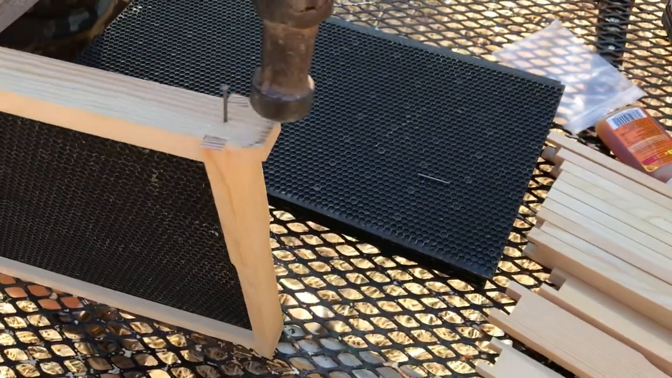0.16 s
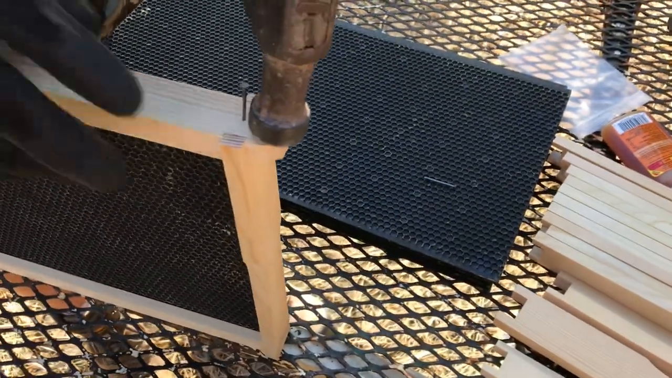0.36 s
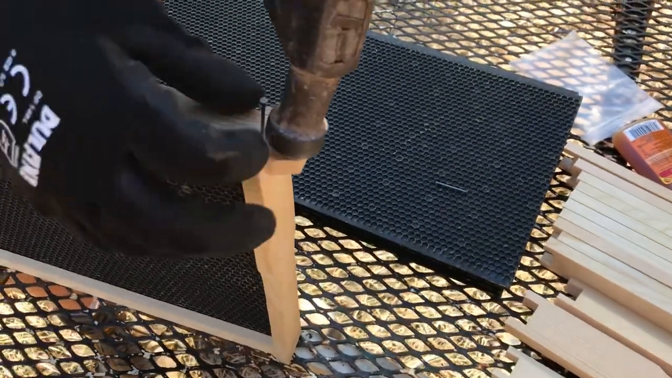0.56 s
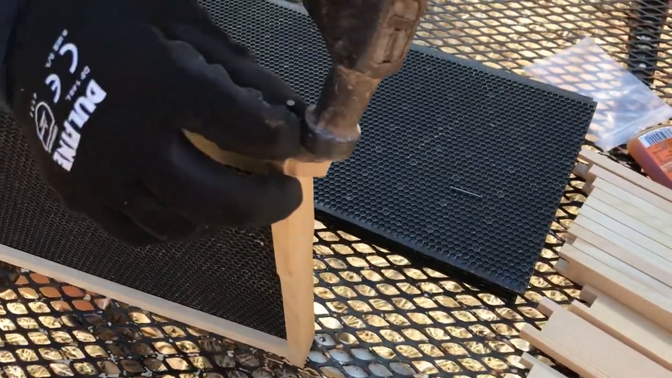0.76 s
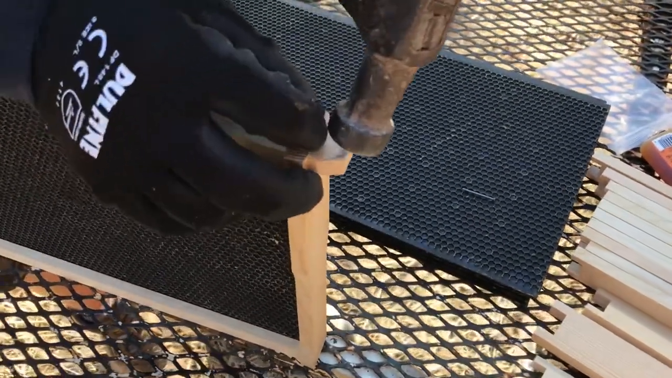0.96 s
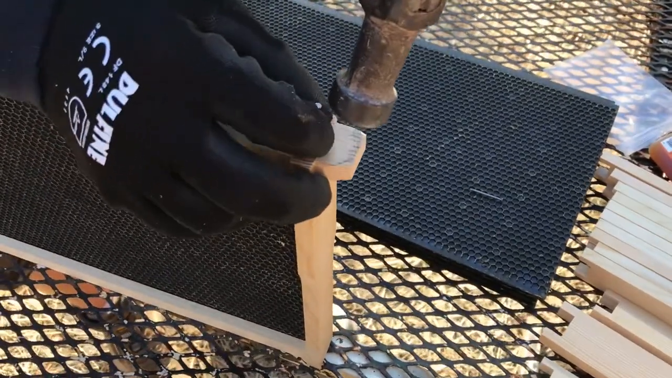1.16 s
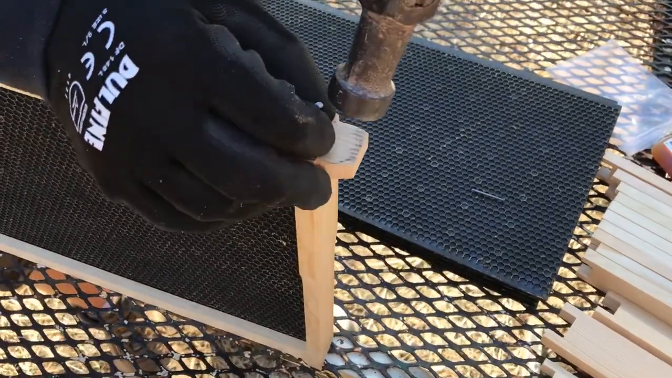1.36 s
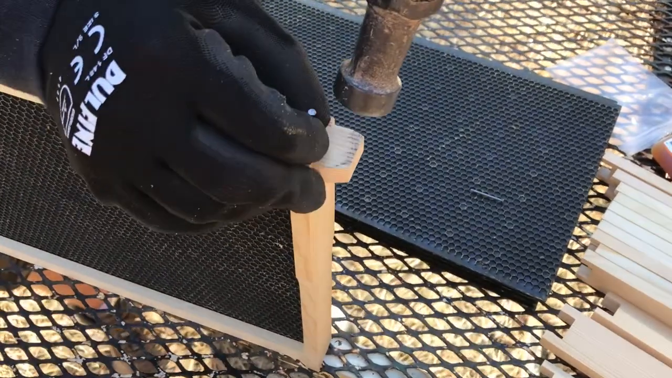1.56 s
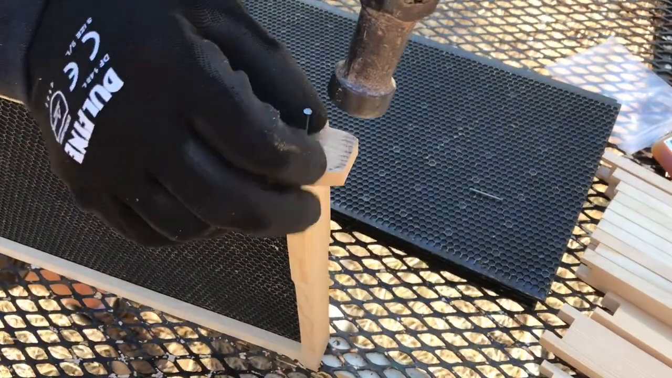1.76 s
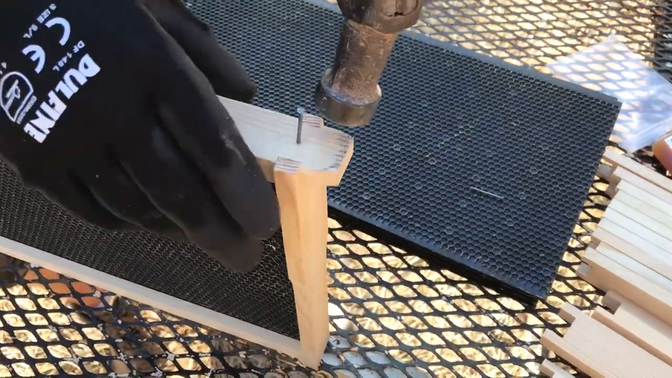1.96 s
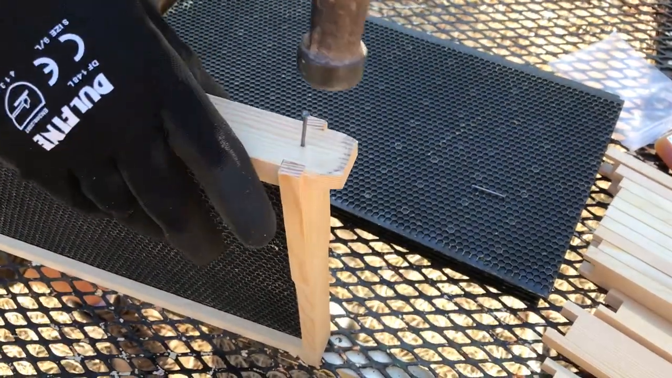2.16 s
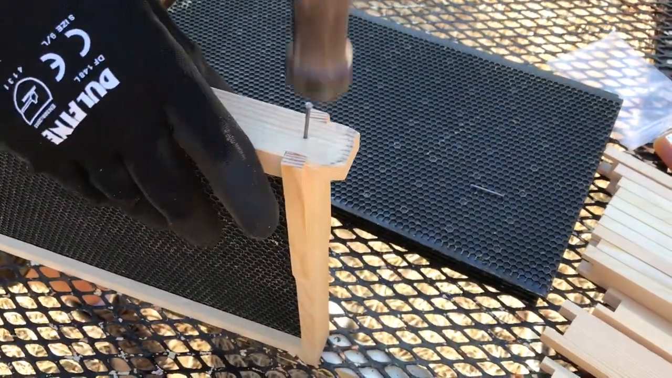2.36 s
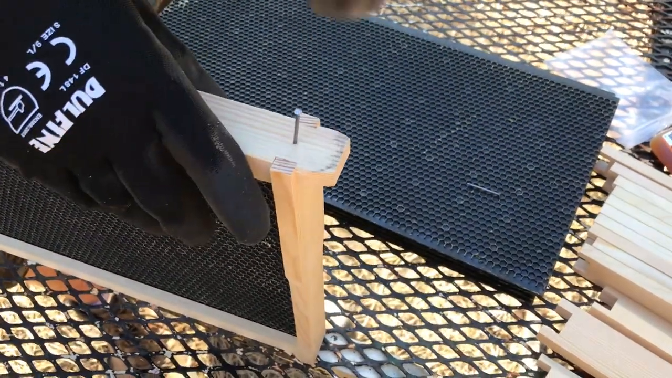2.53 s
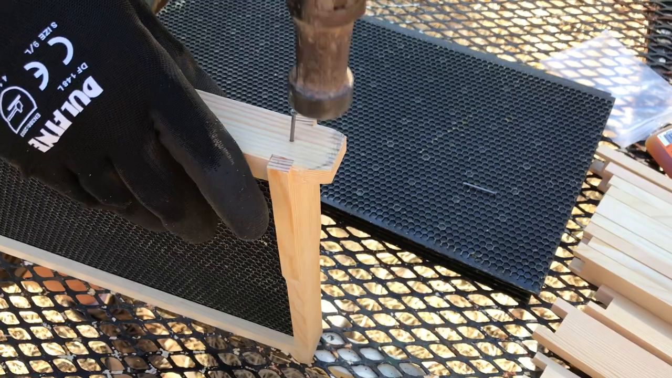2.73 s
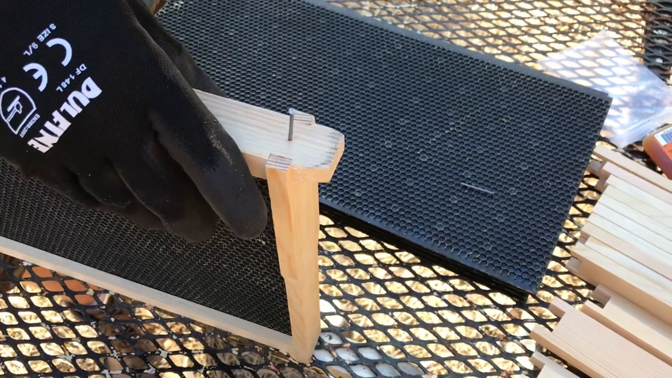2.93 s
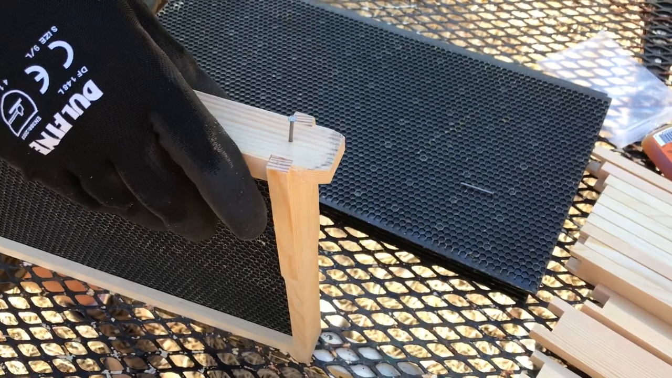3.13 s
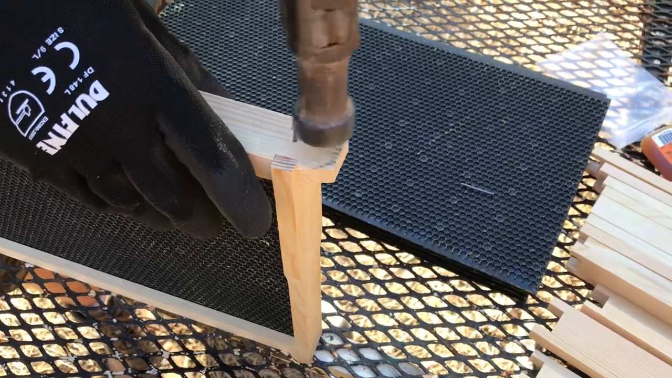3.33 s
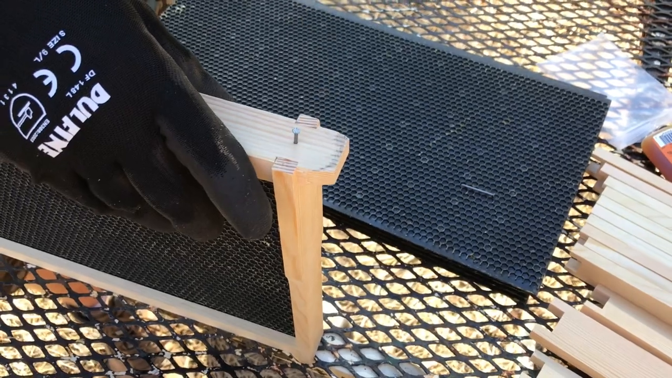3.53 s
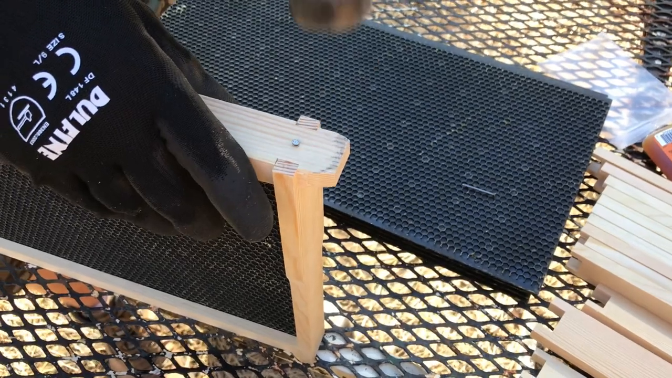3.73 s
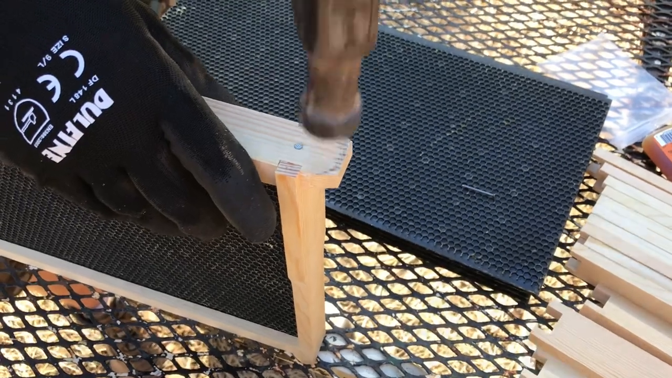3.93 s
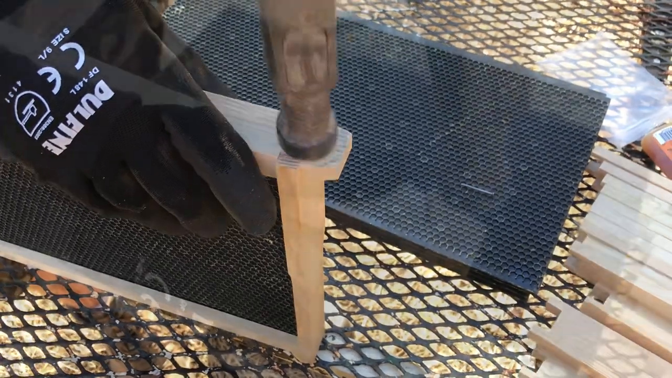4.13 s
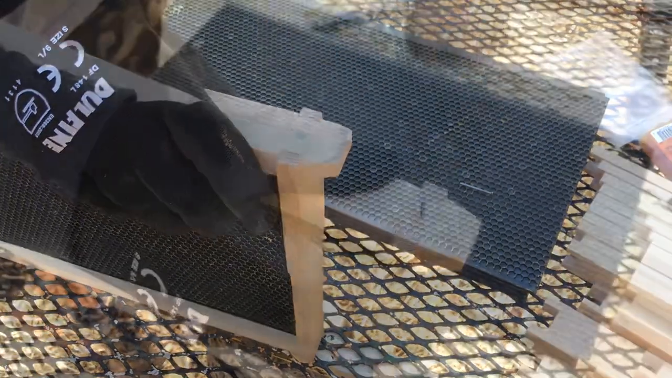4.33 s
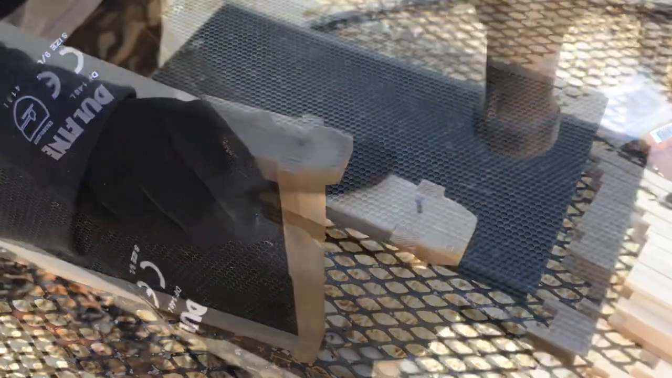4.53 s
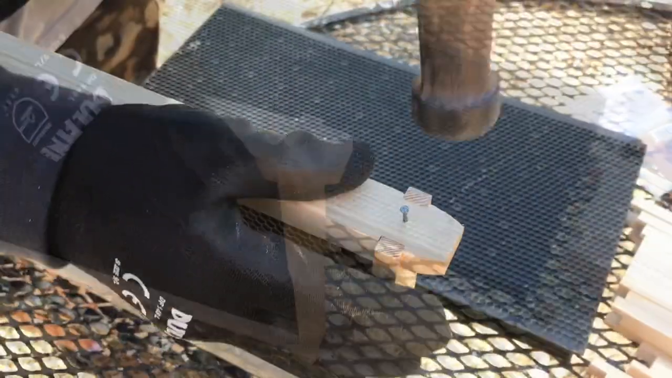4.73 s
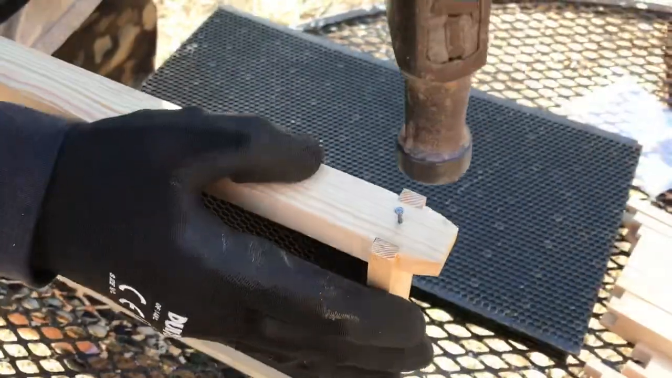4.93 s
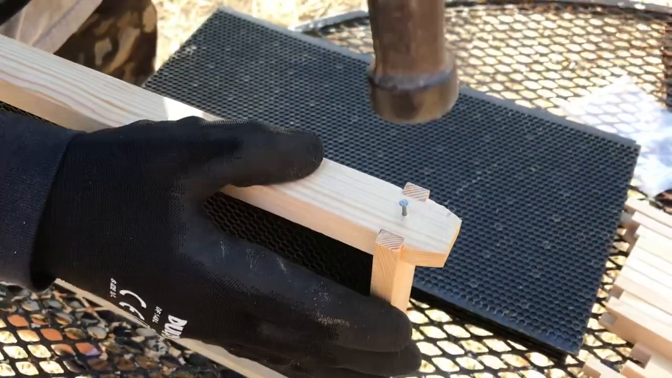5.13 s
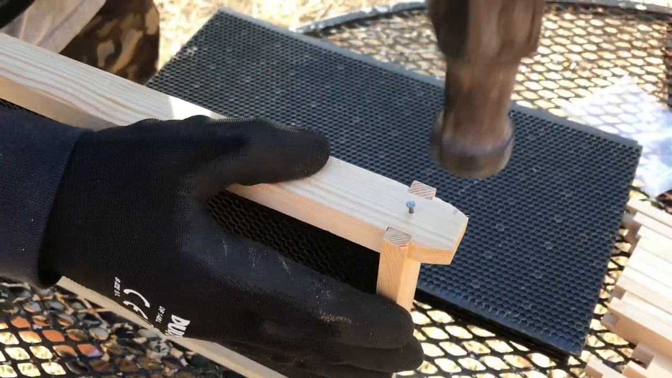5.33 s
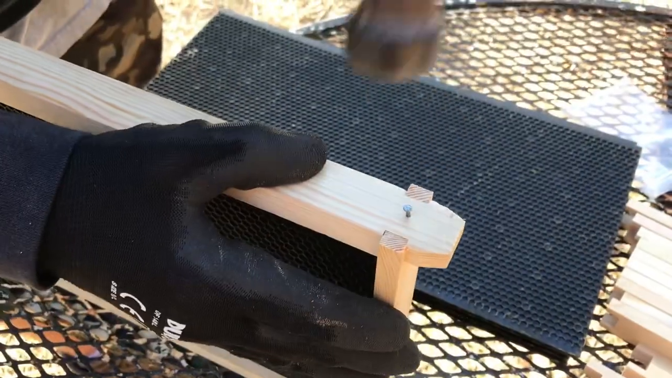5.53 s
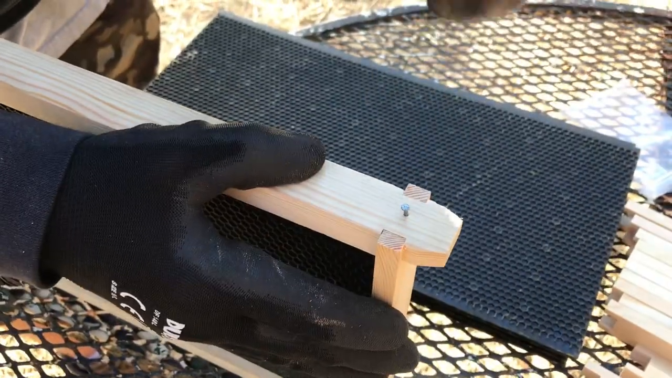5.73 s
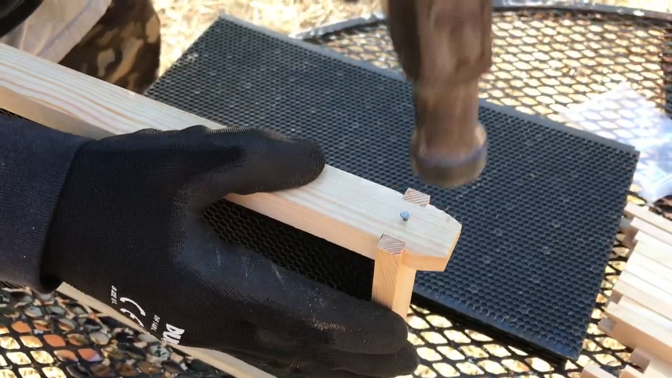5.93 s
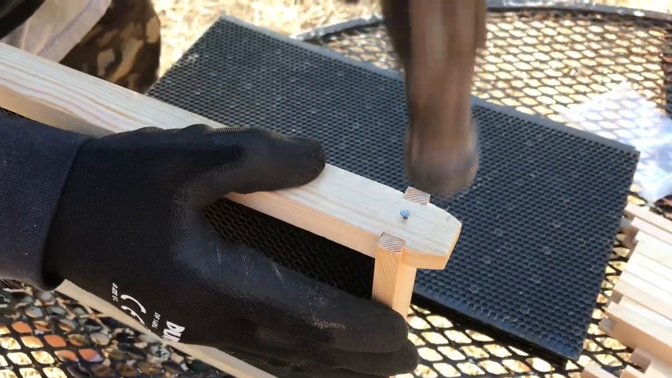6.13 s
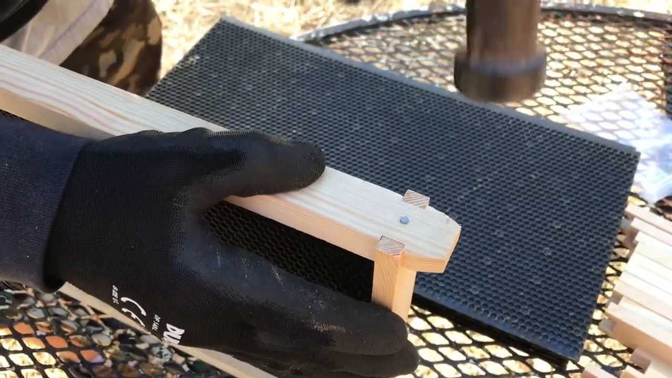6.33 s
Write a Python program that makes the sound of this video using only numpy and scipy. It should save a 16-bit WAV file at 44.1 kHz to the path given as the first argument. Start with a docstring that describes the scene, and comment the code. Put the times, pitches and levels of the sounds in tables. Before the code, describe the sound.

Outdoors, a rubber glove rubs faintly on wood with a few small ticks while distant engines hum. Then a hammer drives a small nail into a wooden frame with eight steady blows, each a sharp steel crack and wooden knock that rattles the metal mesh table beneath. Three more blows follow, with a faint glove squeak after the first. The microphone is close and the sound nearly dry.

```python
"""Close up and outdoors, a hammer drives small nails into wooden frames on a steel mesh table.
A far engine idles in the hush while a rubber glove rubs on the wood, with a faint tap and a few ticks.
A second engine pulls away, and from 2.4 s the blows fall: each cracks on the nail, knocks the wood and
sets the table rattling while the frame bounces on it. From 4.3 s the work is on a second frame, pressed
down harder; the departing engine fades, and the glove squeaks before the last two blows."""
import sys
import numpy as np
from scipy import signal
from scipy.fft import rfft, irfft
from scipy.io import wavfile
from scipy.ndimage import uniform_filter1d

SR = 44100
rng = np.random.default_rng(int(sys.argv[2]) if len(sys.argv) > 2 else 0)


def digitize_waveform(pressure):
    """Quantize a signal to 16-bit integers and store it at the path in sys.argv[1].

    Rows of a 2-D input are taken as channels; values are limited to [-1, 1].
    """
    field = np.atleast_2d(pressure).T
    bounded = np.clip(field, -1, 1)
    quanta = np.round(bounded * 32767).astype(np.int16)
    wavfile.write(sys.argv[1], SR, quanta)


N = 285768
TIME = np.arange(N) / SR
BLOW_T = np.arange(SR // 2) / SR

# bright colour of struck steel: f/Hz, level/dB
STEEL_COLOUR = [(200, -15), (1500, -9), (3000, -9), (5000, -0.5), (7300, 3), (9000, -1.5), (10400, -4.5),
                (12500, -2.5), (15000, -10), (17000, -9.5)]


def gain_of(db):
    """Decibels to amplitude."""
    return 10 ** (np.asarray(db) / 20)


def unit_rms(x, size=None):
    """Scales to rms 1 over the first size samples."""
    return x / np.sqrt(np.mean(x[:size] ** 2) + 1e-20)


def curve_at(points, hz):
    """Joins (f/Hz, value) points on a log-frequency axis."""
    f, value = np.transpose(points)
    return np.interp(np.log(hz + 1), np.log(f + 1), value)


def add(mix, s, sound):
    """Lays a sound into the mix at s seconds."""
    part = mix[max(round(s * SR), 0):][:len(sound)]
    part += sound[:len(part)]


def coloured(x, colour):
    """Equalises by an (f/Hz, level/dB) curve."""
    hz = np.fft.rfftfreq(len(x), 1 / SR)
    return irfft(rfft(x) * gain_of(curve_at(colour, hz)), len(x))


def noise(colour, size):
    """Coloured noise of rms 1."""
    return unit_rms(coloured(rng.standard_normal(size), colour))


def band_rms(x, lo, hi):
    """Rms of x between two frequencies."""
    hz = np.fft.rfftfreq(len(x), 1 / SR)
    band = rfft(x)[(hz > lo) & (hz < hi)]
    return np.sqrt(2 * np.sum(abs(band) ** 2) + 1e-20) / len(x)


def wander(per_s, size):
    """Smooth random motion of rms 1 that changes about per_s times a second."""
    hz = np.fft.rfftfreq(size, 1 / SR)
    return unit_rms(irfft(rfft(rng.standard_normal(size)) / (1 + (hz / per_s) ** 4), size))


def burst(colour, t60, rise_s):
    """A dying puff of noise, rms 1 over its first 3 ms."""
    t = BLOW_T[:4096]
    envelope = (1 - np.exp(-t / rise_s)) * gain_of(-60 * t / t60)
    return unit_rms(noise(colour, len(t)) * envelope, size=132)


def air(mid_db=-63, swell_db=1.25):
    """A gently swelling bed of outdoor rumble and hush, with thin hiss on top."""
    # colour of the bed: f/Hz, level/dB
    colour = [(24, -32), (40, -3), (112, -8), (146, -9.5), (280, -17.5), (769, -25), (955, -22),
              (2270, -32), (7730, -42.5), (8510, -40), (10300, -47.5), (12500, -43), (16200, -73.5),
              (22000, -120)]
    # narrow bands of hiss: f/Hz, half width/Hz, level/dB
    hiss_bands = [(13040, 50, -82.5), (14400, 330, -75)]
    hush = noise(colour, N)
    hush /= band_rms(hush, 300, 3000)
    f = np.fft.rfftfreq(N, 1 / SR)
    hiss = np.zeros(N)
    for hz, width, db in hiss_bands:
        band = rfft(rng.standard_normal(N)) / np.hypot(1, (f - hz) / width)
        hiss += gain_of(db) * unit_rms(irfft(band, N))
    return gain_of(mid_db + swell_db * wander(2.5, N)) * hush + hiss


def idling_engine(drift=0.0031):
    """Only the low firing tones of a distant idle carry this far."""
    # engine hum: f/Hz, rms level/dB
    tones = [(45.4, -59), (68.1, -61), (90.8, -55), (136.2, -59), (158.9, -69)]
    clock = np.cumsum(1 + drift * wander(2.5, N)) / SR
    hum = sum(gain_of(db) * np.sin(2 * np.pi * (hz * clock + rng.random())) for hz, db in tones)
    return np.sqrt(2) * hum


def glove_rub(grain_db=1.5, unsteady_db=1.6, attack_s=0.015, release_s=0.063):
    """Rubber slides on wood: grainy friction that swells and fades with each stroke."""
    # glove strokes: t/s, length/s, level above 3 kHz/dB, tilt/(dB per octave)
    strokes = [(0.0, 0.28, -58, -4), (0.629, 0.28, -66, 0), (1.765, 0.1, -56.5, 2.5), (1.849, 0.3, -61, .5),
               (4.784, .2, -53, 7), (5.0, 0.18, -67, 3.5), (5.497, 0.13, -56.5, 4)]
    # friction colour before the tilt: f/Hz, level/dB
    friction = [(200, -12), (700, -6.5), (1300, 3), (2200, -1), (3200, 3.5), (4300, 5), (5500, -1),
                (8000, -2.5), (11000, -5.5), (16000, -10.5)]
    out = np.zeros(N)
    for s, length, db, tilt_db in strokes:
        size = int(length * SR)
        t = np.arange(size) / SR
        grains = noise([(hz, level + tilt_db * np.log2(hz)) for hz, level in friction], size)
        grains *= gain_of(grain_db * wander(400, size) + unsteady_db * wander(40, size))
        grains /= band_rms(grains, 3000, 16000)
        pressure = np.minimum(t / attack_s, 1) * np.minimum((length - t) / release_s, 1) ** 2
        add(out, s, gain_of(db) * pressure * grains)
    return out


def nail_crack(catch_s=.0014, catch_db=-4, fizz_db=-9):
    """Steel meets steel in a sharp pulse; the nail slips into the wood and is caught again."""
    pulse = unit_rms(coloured(signal.unit_impulse(4096, 16), STEEL_COLOUR), size=132)
    out = .6 * pulse + burst(STEEL_COLOUR, t60=.003, rise_s=.00004)
    add(out, catch_s, gain_of(catch_db) * burst(STEEL_COLOUR, t60=0.0099, rise_s=.00005))
    fizz = gain_of(fizz_db) * burst(STEEL_COLOUR, t60=.035, rise_s=0.0013)
    return unit_rms(out + fizz, size=132)


def head_ring(hz=5675, relative_db=-54, t60=.9):
    """The steel hammer head sings on faintly in its one lasting mode."""
    return gain_of(relative_db - 60 * BLOW_T / t60) * np.sin(2 * np.pi * hz * BLOW_T)


def wood_knock(modes, pitch, spread_db=1.5, detune=.003):
    """The wooden frame rings briefly, a little differently at every blow."""
    hz, db, t60 = np.transpose(modes)[:, :, None]
    level, shift = rng.standard_normal((2, len(modes), 1))
    t = BLOW_T[:6000]
    envelopes = gain_of(db + spread_db * level - 60 * t / t60)
    rings = envelopes * np.sin(2 * np.pi * hz * pitch * (1 + detune * shift) * t)
    signs = (-1.) ** np.arange(len(modes))[:, None]  # neighbouring modes swing in opposite senses
    return unit_rms((signs * rings).sum(0), size=353)


def mesh_rattle(bass_db, treble_db, stretch, swell_s=0.0046, bass_swell_s=0.017):
    """The loose mesh chatters in clumps, dying faster as it comes to rest."""
    # mesh colour before the tilt: f/Hz, level/dB
    colour = [(30, -27.5), (60, -3.5), (120, 1), (200, -2), (270, -7), (360, -7), (470, -7.5), (600, 1),
              (1300, 2), (2500, -2), (4200, -6), (5200, -10.5), (8500, -19), (10500, -24.5), (12500, -22.5),
              (16000, -29)]
    # mesh decay before stretch and settling: f/Hz, t60/s
    decay = [(80, 0.43), (300, 0.41), (800, .31), (1600, 0.23), (4000, 0.3), (8000, 0.49), (15000, 0.22)]
    size = len(BLOW_T)
    hz, t, spectrum = signal.stft(noise(colour, size), SR, nperseg=256, noverlap=192)
    hz = hz[:, None]
    tilt_db = curve_at([(500, bass_db + 2.5), (1400, 0.0018), (3800, treble_db + 1.5)], hz)
    age = t / stretch
    decay_db = -60 * age / curve_at(decay, hz)
    settle_db = -9 * (age / 0.087) ** 2 * curve_at([(100, 0.16), (1200, 0.27), (8000, 0.81)], hz)
    clumps = np.interp(t, BLOW_T, wander(160, size))
    chatter_db = 3 * clumps * curve_at([(300, .2), (1500, 0.92), (7000, 0.95)], hz)
    spectrum *= gain_of(tilt_db + decay_db + settle_db + chatter_db)
    rattle = signal.istft(spectrum, SR, nperseg=256, noverlap=192)[1][:size]
    # the heavy, slow motion of the table builds up later than its chatter
    boom = coloured(rattle, [(400, -7.5), (800, -37)])
    out = boom * (1 - np.exp(-BLOW_T / bass_swell_s))
    out += (rattle - boom) * (1 - np.exp(-BLOW_T / swell_s))
    return out / band_rms(out[617:2866], 900, 2500)  # mids at rms 1 from 14 to 65 ms


def frame_bounce(clack_db, tick_db):
    """The frame meets the mesh: a hard clack with a bright tick on top."""
    # colour of wood on mesh: f/Hz, level/dB
    colour = [(200, -23), (1000, -9), (2400, -10.5), (3100, -5.5), (3650, 6.5), (4300, -1.5), (5200, -16),
              (8000, -30), (16000, -36)]
    clack = gain_of(clack_db) * burst(colour, t60=0.012, rise_s=0.0011)
    tick = gain_of(tick_db) * burst(STEEL_COLOUR, t60=0.015, rise_s=0.00026)
    return clack + tick


def steel_table(shaking):
    """The table's resonances ring on top of whatever shakes it."""
    # table resonances: f/Hz, width/Hz, level relative to the shaking/dB
    resonances = [(345, 35, 6), (880, 40, -6), (1010, 35, -5), (1135, 50, -4), (1430, 45, 4),
                  (1519, 25, -1), (1845, 30, -2), (1928, 25, -3), (2070, 60, -7), (2334, 50, -7),
                  (2684, 35, -5), (2960, 60, -3), (3123, 50, -4), (4385, 60, -1), (4777, 30, -5),
                  (3597, 34, 2)]
    out = shaking.copy()
    for hz, width, db in resonances:
        radius = np.exp(-np.pi * width / SR)
        pole = radius * np.exp(2j * np.pi * hz / SR)
        out += 2 * gain_of(db) * signal.lfilter([1 - radius], [1, -pole], shaking).real
    return out


def hammering(crack_trim_db=1, rattle_trim_db=-2, clack_trim_db=-3.5, tick_trim_db=-23):
    """Each blow sounds nail, frame and table; the frame jumps, lands, rebounds and hops to rest."""
    # hammer blows, before the trims: t/s, steel/dB, wood/dB, rattle/dB, rattle treble/dB,
    # wood pitch/ratio, landing/dB, rebound delay/s, rebound/dB
    blows = [(0.3718, -56, -51.5, -52.5, -10.5, 0.93, -51, 0.022, -65),
             (2.43, -14.5, -18, -27, -2.5, 1, -12, .0237, -18),
             (2.7273, -13, -20, -25.5, -0.5, 0.94, -10.5, 0.028, -14.5),
             (3.023, -13.5, -16.5, -26, -1.5, 0.96, -11.5, 0.022, -23),
             (3.3292, -13.5, -26, -27, -2, 1, -20, 0.023, -19),
             (3.6219, -13, -23.5, -23, -3, 1, -12, .0348, -19.5),
             (3.894, -13.5, -24, -18.5, -1.5, 1, -8, 0.029, -20.5),
             (4.1348, -33.5, -27.5, -37, 2, 1.0, -43, 0.022, -45),
             (4.148, -14, -20.5, -18, 0.5, 0.99, -20, .024, -16.5),
             (4.4523, -19.5, -20.5, -34, 1, 1.0, -32, .027, -30),
             (5.2581, -15, -13, -27, 0.5, 0.97, -15, 0.025, -19),
             (5.8785, -15, -13.5, -28.5, 0, 0.99, -28, 0.023, -24),
             (6.2009, -13.5, -13.5, -25.5, -0.5, 1.0, -18, 0.025, -17)]
    # wood modes of each frame: f/Hz, level/dB, t60/s
    first_frame = [(696, 2, 0.024), (1243, 3, 0.032), (1340, -0.5, 0.042), (1660, -4, 0.12),
                   (1901, -2, .04), (2488, -4, .03), (4230, -3, 0.062), (6000, -2.5, 0.04),
                   (6720, -3.5, 0.048), (7400, -7.5, 0.015)]
    second_frame = [(290, -12, 0.037), (635, -8, 0.098), (742, 4, 0.026), (884, 2, 0.042),
                    (1034, -5, 0.076), (1470, -10, .04), (1562, -6, 0.099), (1756, -6.5, 0.091),
                    (2244, -9, .04), (2860, -11, 0.062), (3360, -5, 0.041), (4220, -8.5, .08),
                    (4300, -4, 0.072), (6750, 4.5, 0.019)]
    # last small hops, relative to the blow's steel level: delay/s, clack/dB, tick/dB
    hops = [(.046, -19, -20.5), (.066, -19.5, -20.5), (.098, -29, -33.5), (.116, -29, -34.5)]
    second_frame_s, landing_s = 4.3, 0.0082
    hop_jitter_s, hop_spread_db = 0.0013, 2
    direct, shaking = np.zeros((2, N))
    for s, steel_db, wood_db, rattle_db, treble_db, pitch, landing_db, rebound_s, rebound_db in blows:
        if s < second_frame_s:
            modes, stretch, held_db_per_s = first_frame, 0.92, 0
        else:  # the hand presses harder, choking the rattle and the later hops
            modes, stretch, held_db_per_s = second_frame, 0.85, 44
        add(direct, s, gain_of(steel_db + crack_trim_db) * nail_crack())
        add(direct, s, gain_of(steel_db) * head_ring())
        add(direct, s, gain_of(wood_db) * wood_knock(modes, pitch))
        # hard blows rattle longer and thinner; soft taps boom
        force_db = rattle_db + 27  # 0 for a normal blow
        bass_db = min(-0.6 * force_db, 11.5)
        stretch *= np.exp(0.0228 * force_db)
        add(shaking, s, gain_of(rattle_db + rattle_trim_db) * mesh_rattle(bass_db, treble_db, stretch))
        for delay, db in (landing_s, landing_db), (rebound_s, rebound_db):
            add(shaking, s + delay, frame_bounce(db + clack_trim_db, db + tick_trim_db))
        for delay, clack_db, tick_db in hops:
            late, strong = rng.standard_normal(2)
            hop_db = steel_db - held_db_per_s * delay + hop_spread_db * strong
            hop = gain_of(hop_db) * frame_bounce(clack_db + clack_trim_db, tick_db)
            add(shaking, s + delay + hop_jitter_s * late, hop)
    return direct + steel_table(shaking)


def handling_ticks():
    """Nail, frame and glove touch in small ticks and taps."""
    # light contacts: t/s, level/dB, strongest f/Hz, t60/s
    ticks = [(0.698, -54, 1700, 0.046), (0.755, -48, 450, 0.039), (1.5328, -48, 8950, .025),
             (1.557, -44.5, 9000, 0.014), (1.952, -50, 2620, 0.067), (5.43, -54, 3470, 0.037),
             (5.579, -50.5, 6940, 0.037), (6.336, -52, 3474, 0.028)]
    out = np.zeros(N)
    for s, db, hz, t60 in ticks:
        colour = [(hz / 10, -18), (hz / 2, -6), (hz, 0), (hz * 2, -8), (hz * 10, -34)]
        add(out, s, gain_of(db) * burst(colour, t60, rise_s=.0001))
    return out


def departing_engine(waver_db=2):
    """A distant engine pulls away: its firing tone climbs, swells and fades."""
    # the run through the revs: t/s, firing f/Hz, level/dB
    revs = [(1.55, 64.7, -55), (1.68, 71.4, -50), (1.85, 89.6, -42), (2.0, 95.5, -40.5),
            (2.62, 98.7, -36.5), (2.84, 98.9, -38.5), (3.2, 109.9, -42.5), (3.46, 113.5, -45),
            (4.78, 116.5, -59.5)]
    # engine orders: multiple of the firing rate, relative level/dB
    orders = [(.5, -20), (1, 0), (1.5, -24), (2, -24)]
    s, hz, db = np.transpose(revs)
    cycles = np.cumsum(np.interp(TIME, s, hz)) / SR
    drone = sum(gain_of(level) * np.sin(2 * np.pi * (k * cycles + rng.random())) for k, level in orders)
    in_earshot = uniform_filter1d(1. * ((TIME > s[0]) & (TIME < s[-1])), size=SR // 5)
    swell = gain_of(np.interp(TIME, s, db) + waver_db * wander(4.4, N))
    return np.sqrt(2) * drone * in_earshot * swell


def glove_squeak(jitter=.006, scratch=.3):
    """Rubber sticks to the wood and lets go in a quick train of sharp slips."""
    # squeak contour: t/s, slip f/Hz, level/dB
    contour = [(5.661, 440, -52), (5.671, 430, -44), (5.684, 460, -45), (5.697, 505, -45),
               (5.709, 440, -48), (5.721, 290, -47)]
    # squeak colour: f/Hz, level/dB
    colour = [(200, -6), (450, 4), (950, 8), (1900, -4), (2500, -5), (3100, 7.5), (4100, -2), (5100, 1),
              (8000, 0.5), (16000, 2)]
    s, hz, db = np.transpose(contour)
    t = np.arange(s[0], s[-1], 1 / SR)
    cycles = np.cumsum(np.interp(t, s, hz) * (1 + jitter * wander(200, len(t)))) / SR
    slips = unit_rms(sum(np.cos(2 * np.pi * k * cycles) for k in range(1, 36)))
    slips += scratch * rng.standard_normal(len(t))
    out = np.zeros(N)
    add(out, s[0], unit_rms(coloured(slips, colour)) * gain_of(np.interp(t, s, db)))
    return out


def outdoor_echoes(x, wet_db=-32, t60=0.23, build_s=0.024):
    """The open surroundings send back a faint, dull tail."""
    t = np.arange(SR) / SR
    colour = [(100, 0.95), (1200, 0), (4000, -10), (12000, -20)]
    tail = noise(colour, len(t)) * gain_of(-60 * t / t60) * (1 - np.exp(-t / build_s))
    return gain_of(wet_db) * signal.fftconvolve(x, tail / np.linalg.norm(tail))[:N]


def scene():
    """Close, nearly dry work at the table over a bed of engines and air."""
    work = hammering() + glove_rub() + handling_ticks() + glove_squeak()
    return (work + outdoor_echoes(work) + idling_engine() + departing_engine() + air())[None]


def record(dry, low_cut_hz=36, high_cut_hz=16150):
    """The microphone sheds the deepest bass, rounds peaks near full scale and cuts the very top."""
    lean = signal.sosfilt(signal.butter(6, low_cut_hz, "high", fs=SR, output="sos"), dry)
    rounded = lean / (1 + lean ** 8) ** (1 / 8)
    high_cut = signal.firwin(191, high_cut_hz, window=("kaiser", 8), fs=SR)
    return signal.oaconvolve(rounded, high_cut[None], "same")


dry = scene()
out = record(dry)
digitize_waveform(out)
```